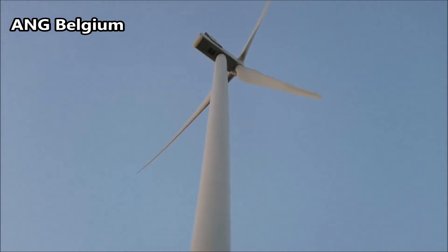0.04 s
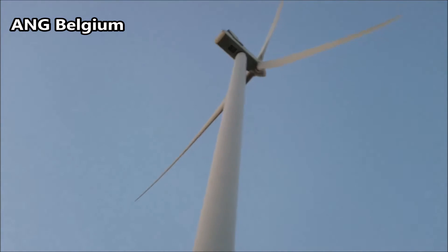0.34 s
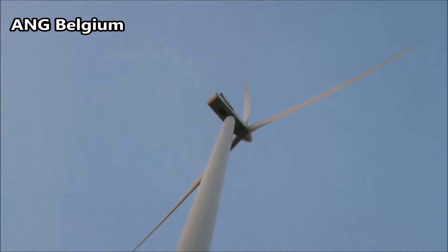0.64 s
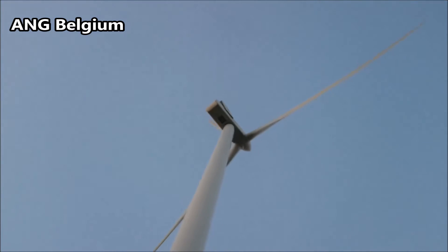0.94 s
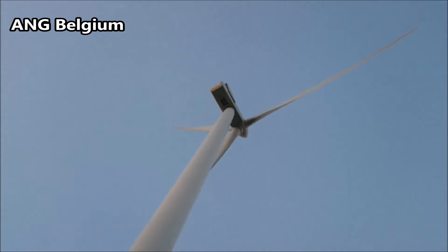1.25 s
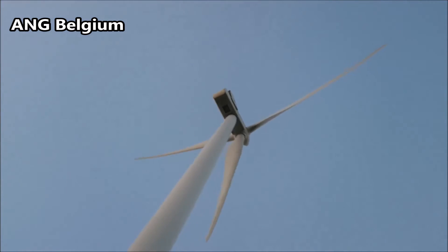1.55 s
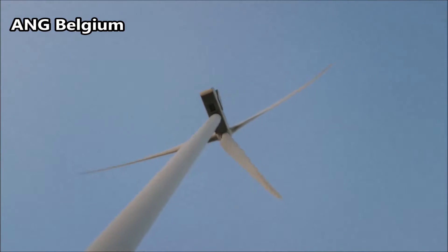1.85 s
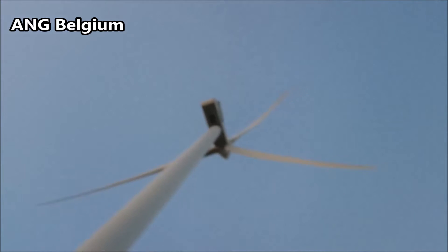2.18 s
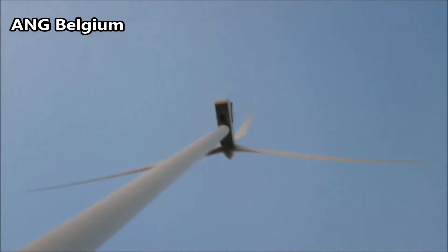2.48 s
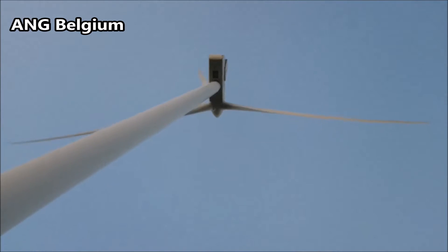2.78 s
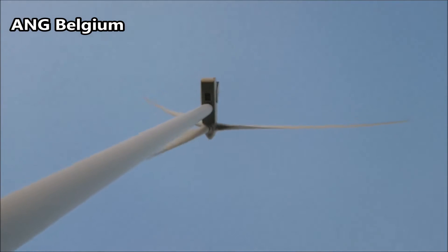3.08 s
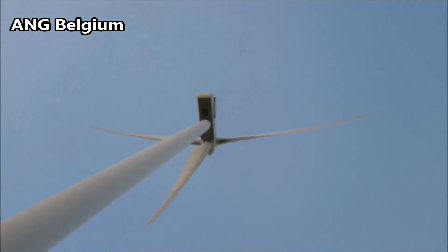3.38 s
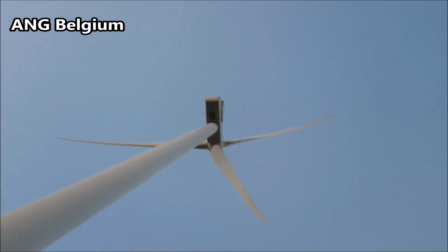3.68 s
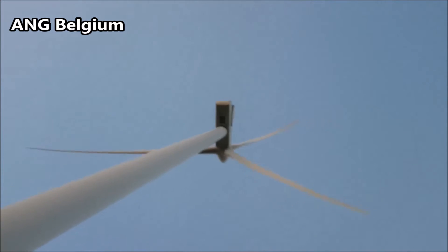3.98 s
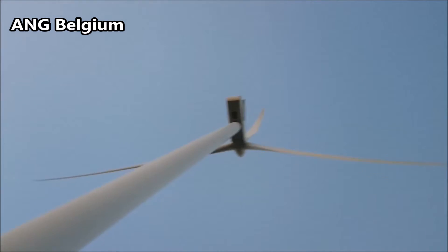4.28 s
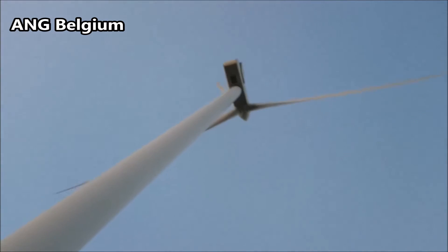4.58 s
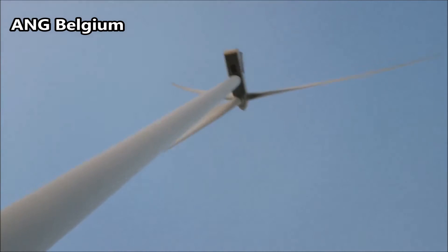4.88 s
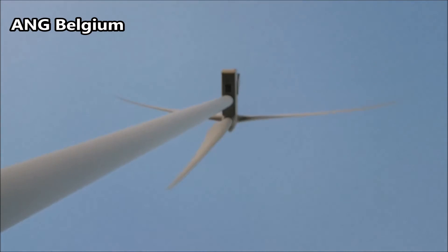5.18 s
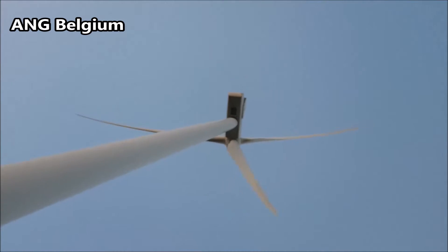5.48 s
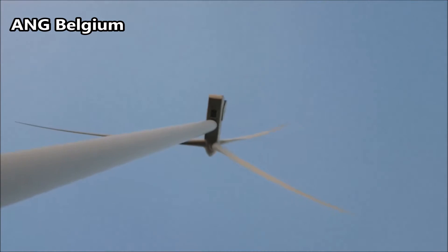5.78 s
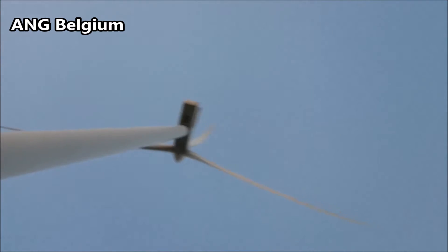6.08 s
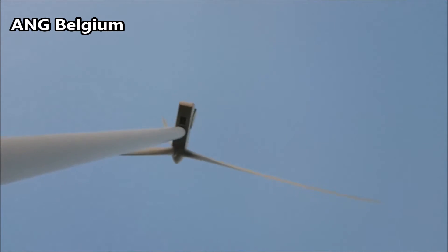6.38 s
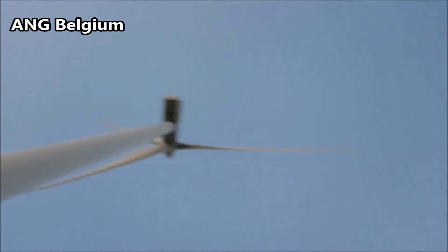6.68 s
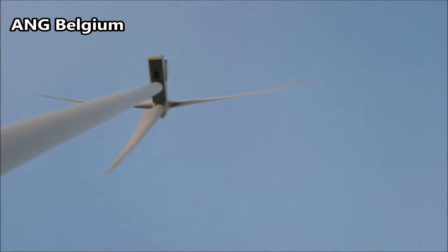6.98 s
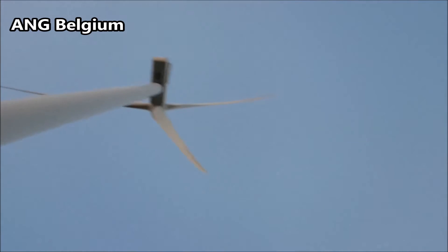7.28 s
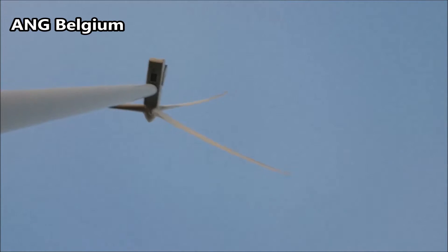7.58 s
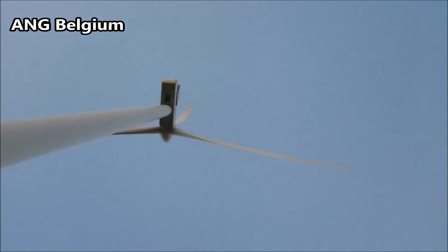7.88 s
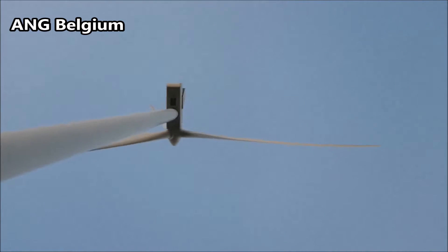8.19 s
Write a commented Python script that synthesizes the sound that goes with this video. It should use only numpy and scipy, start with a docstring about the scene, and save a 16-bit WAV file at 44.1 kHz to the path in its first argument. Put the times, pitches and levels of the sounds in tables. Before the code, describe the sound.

Heavy wind buffeting opens on a hand-held stereo microphone, rumbling and thumping, then settles into lighter, irregular gusts with crackles and hollow puffs. Farther off, the blades of a wind turbine give a soft rush that swells every couple of seconds, while its gears hold a faint, high whine that fades in and out. Now and then a small bird adds thin, faraway chirps in the open air.

```python
"""Gusts under a wind turbine

At the foot of a large turbine, on a hand-held camera's stereo microphone. Gusts hit the two ports
directly, and each rumbles, sputters and hoots in its own eddies. Farther off the blades swish by
and the gearbox whines; a small bird chirps thinly in the distance."""
import sys
import numpy as np
from scipy import signal
from scipy.fft import rfft, irfft, next_fast_len
from scipy.io import wavfile
from scipy.ndimage import uniform_filter1d, minimum_filter1d

SR = 44100
rng = np.random.default_rng(int(sys.argv[2]) if len(sys.argv) > 2 else 0)


def materialize(psi):
    """Save the field psi as 16-bit PCM at rate SR to the path in sys.argv[1].

    A 1-D psi becomes a single channel; in a 2-D psi each row is a channel.
    """
    bounded = np.clip(np.atleast_2d(psi).T, -1, 1)
    quanta = np.round(bounded * 32767).astype(np.int16)
    wavfile.write(sys.argv[1], SR, quanta)


N = 372644
FRAME, HOP = 1024, 256
TIME = np.arange(N) / SR
FRAME_S = np.arange(N // HOP + 5) * HOP / SR
BIN_HZ = np.fft.rfftfreq(FRAME, 1 / SR)


def gain_of(db):
    """Decibels to amplitude."""
    return 10 ** (np.asarray(db) / 20)


def unit_rms(x):
    """Scales to rms 1."""
    return x / np.sqrt(np.mean(x ** 2) + 1e-20)


def at_hz(points, hz):
    """A spectrum's value, interpolated on a log-frequency axis."""
    f, value = np.transpose(points)
    return np.interp(np.log(hz + 1), np.log(f + 1), value)


def at_time(rows, t):
    """The columns of a curve table at times t."""
    times, *columns = np.transpose(rows)
    return [np.interp(t, times, column) for column in columns]


def add(mix, start_s, sound):
    """Mixes a sound in at start_s, or at zero if that is negative."""
    part = mix[max(round(start_s * SR), 0):][:len(sound)]
    part += sound[:len(part)]


def filtered(x, response):
    """Filters by a gain that is a function of frequency."""
    size = next_fast_len(len(x) + 2048, True)
    return irfft(rfft(x, size) * response(np.fft.rfftfreq(size, 1 / SR)), size)[:len(x)]


def lowpass(x, hz, order):
    """Rolls off above hz, by 6 dB an octave for each order."""
    return filtered(x, lambda f: 1 / (1 + (f / hz) ** order))


def wander(rate_hz):
    """A smooth random curve of rms 1, moving at up to about rate_hz."""
    coarse = TIME[::32]
    hz = np.fft.rfftfreq(len(coarse), coarse[1])
    spectrum = rfft(rng.standard_normal(len(coarse))) / (1 + (hz / rate_hz) ** 4)
    return unit_rms(np.interp(TIME, coarse, irfft(spectrum, len(coarse))))


def band_noise(count, hz, width_hz):
    """Noise of rms 1 in one resonance."""
    white = rng.standard_normal(count)
    return unit_rms(filtered(white, lambda f: 1 / (1 + (2 * (f - hz) / width_hz) ** 2)))


def shaped(noise, field_db):
    """Gives unit white noise a level per Hz that changes in time (frames x bins)."""
    framing = dict(nperseg=FRAME, noverlap=FRAME - HOP)
    frames = signal.stft(np.pad(noise, (0, 2 * FRAME)), **framing)[2][:, :len(FRAME_S)]
    return np.sqrt(SR / 2) * signal.istft(frames * gain_of(field_db.T), **framing)[1][:N]


# Steady wind on each port, easing as the camera turns. Small eddies are bright, large ones weighty.
# time_s, strength_db, brightness_db, weight_db
LEFT_FLOW = [(0.0, 2, -2, 4), (.45, -3.5, -2, 10.5), (.8, 1, -7.5, 6.5), (1.25, 2.5, -1.5, 1),
             (1.65, 5.5, -3.5, 5), (2.1, 2.5, -1.5, -3.5), (2.55, 4.5, -6.5, -2.5), (3.0, 4.5, -7.5, -3),
             (3.4, 0.5, -7, 2.5), (3.85, -4.5, 2.5, 1), (4.1, 4, 0, -4), (4.8, 3, -12, 3),
             (5.2, 0.5, 2, -10), (5.6, -8.5, 7, -3), (5.85, -5, 3.5, 0), (6.5, 0.5, 2, 2),
             (7.4, -2.5, 3, -3), (8.44, -1, -2.5, 3)]
RIGHT_FLOW = [(0.0, 14, 7.5, 2), (.3, 12, -2, 3.5), (.65, 9.5, -0.5, 0), (1.0, 7.5, -2.5, -3.5),
              (1.35, 6, -0.5, -3), (1.8, 6.5, -2, 1.5), (2.099, 1.5, -2.5, -3), (2.5, -5.5, -9.5, 6),
              (3.0, -3.5, -7.5, 5), (3.5, -5, -11, 6.5), (3.9, -1.5, -9, 3), (4.2, 0, -8, 3.5),
              (4.6, -0.5, -12, 4.5), (5.1, -0.5, -3.5, -1.5), (5.4, -3.5, -10, 3), (6.0, -4, -5.5, 4),
              (6.55, -2.5, 1, 1), (7.0, -3.5, -6.5, 0.5), (7.5, -6, -13, 6), (8.44, -8, -9, 5)]
# Gusts that bump the mic, and lulls: middle_s, length_s, left_db, right_db, brightness_db, weight_db
GUSTS_AND_LULLS = [(.17, 0.35, 1, -1, 3, 1.5), (0.38, 0.14, -5, 3, -3, -5), (0.635, 0.13, 3.5, 4, 0.5, 1),
                   (1.249, 0.039, 8.5, 3.5, 0, -1), (1.335, 0.085, 2, -7, 2, 2.5),
                   (1.44, 0.087, -1, 0.5, 1, 8), (1.59, 0.11, -1.5, -0.5, -4.5, -1),
                   (1.784, 0.089, 3, 0.5, 1.5, -1), (2.189, 0.14, -5.5, 1.5, -5, 3.5),
                   (2.287, 0.16, 4.5, 9, -3.5, -6.5), (2.526, 0.15, 4, 3, 2, 0.5),
                   (2.749, 0.25, 7.5, 8.5, 1, -1.5), (3.01, 0.079, 0.5, -7.5, 2, 9),
                   (3.127, 0.1, -3, 0.5, -2, 6.5), (3.248, 0.12, -1.5, -10.5, 9, 7.5),
                   (3.48, 0.033, 4.5, -5, 3.5, -2), (3.632, 0.17, 11.5, 2.5, -7, -4.5),
                   (3.77, 0.066, -3, -5.5, 2, -1.5), (4.163, 0.18, 2, 6, 2, -4), (4.27, .06, 1, 1, 0.5, -5),
                   (4.51, 0.15, 4, 2, 0, 1), (4.662, 0.16, 2.5, -5.5, 0.5, -1.5),
                   (4.89, 0.58, 5, 5, 3.5, -5.5), (5.187, 0.08, 5, 0, 3, 3), (5.797, 0.23, 6, 4.5, 3, 1.5),
                   (5.99, 0.16, 1, -8, 2.5, 2), (6.194, 0.078, -5, -2.5, 0, 4),
                   (6.395, 0.084, 5.5, 0.5, -4, -2), (6.753, 0.23, -4, -3, -0.5, 2.5),
                   (6.859, 0.16, 3, 5.5, -3.5, 1.5), (7.063, 0.095, -9, 1, 1, -4),
                   (7.126, 0.29, 3, 7, -5.5, -6), (7.696, 0.1, 5, 5, -5, 1.5), (7.89, 0.08, -3, -7, -4, 6),
                   (8.024, 0.23, 1.5, 3.5, 0, 1)]
def wind_at(port, t):
    """Strength, brightness and weight in dB on port 0 (left) or 1 (right): steady flow plus gusts."""
    strength, bright, weight = at_time((LEFT_FLOW, RIGHT_FLOW)[port], t)
    for middle_s, length_s, left_db, right_db, bright_db, weight_db in GUSTS_AND_LULLS:
        swell = np.cos(np.pi * np.clip((t - middle_s) / length_s, -.5, .5))
        strength += swell * (left_db, right_db)[port]
        bright += swell * bright_db
        weight += swell * weight_db
    return strength, bright, weight


def eddies():
    """White noise whose low bands each carry a steady flow of energy."""
    white, steadying = rng.standard_normal(N), np.zeros(N)
    for low_hz, high_hz in [(0, 110), (110, 330), (330, 1000)]:
        band = filtered(white, lambda f: (f >= low_hz) & (f < high_hz))
        power = uniform_filter1d(uniform_filter1d(band ** 2, size=2400), size=2400)
        steadying += band * (np.sqrt(power.mean() / power) - 1)
    return white + steadying


# Turbulence right on each port in average wind: frequency_hz, level_db_per_hz
LEFT_TURBULENCE = [(10, -45.5), (43, -56.5), (90, -56.5), (160, -55.5), (280, -57.5), (450, -61),
                   (700, -69), (1000, -76.5), (1450, -85), (2000, -93), (3000, -107), (6000, -125),
                   (16000, -145)]
RIGHT_TURBULENCE = [(10, -34.5), (43, -42.5), (90, -41), (170, -46.5), (280, -53), (450, -61), (700, -70.5),
                    (1000, -79), (1450, -83.5), (2000, -99), (3000, -104), (6000, -113), (10000, -123),
                    (16000, -135)]
def buffet(port, unsteady_db, puffy_db, sputter_db, sputter_hz, split_hz, puff_slope, top_slope):
    """Wind on one port: large eddies rumble, small ones come in puffs and quick sputters."""
    strength, bright, weight = wind_at(port, FRAME_S)
    strength += unsteady_db * np.interp(FRAME_S, TIME, wander(6.3))
    bright += puffy_db * np.interp(FRAME_S, TIME, wander(6.7))
    small = at_hz([(230, 0.047), (450, 0.56), (720, puff_slope), (1300, top_slope)], BIN_HZ)
    large = at_hz([(80, 0.9), (150, 0)], BIN_HZ)
    average_db = at_hz((LEFT_TURBULENCE, RIGHT_TURBULENCE)[port], BIN_HZ)
    field_db = average_db + strength[:, None] + np.outer(bright, small) + np.outer(weight, large)
    flow = shaped(eddies(), field_db)
    flow *= unit_rms(gain_of(2.33 * wander(25)))  # the whole stream lurches
    rumble = lowpass(flow, split_hz, order=4)
    sputter = unit_rms(gain_of(sputter_db * 2 * np.tanh(wander(sputter_hz) / 2)))
    return rumble + (flow - rumble) * sputter


def swish(t, blade_s=1.755, start_s=1.735, rise_s=.16, hold_s=.23, fade_s=.82):
    """A blade comes down every blade_s: rise, hold, fade and lull, between about -1/2 and 1/2."""
    corners_s = np.cumsum([0, rise_s, hold_s, fade_s])
    return np.interp((t - start_s) % blade_s, corners_s, [-.54, .64, .45, -.5])[:, None]


# Rush of the blades, heard from the ground: frequency_hz, level_db_per_hz
RUSH_SPECTRUM = [(100, -66.5), (500, -78), (1000, -85.5), (1400, -88), (2000, -95), (2500, -92.5),
                 (3200, -90.5), (4200, -95), (5200, -101), (7000, -108), (11000, -115), (13000, -120),
                 (14200, -117), (15500, -121)]
# Its mean treble level as the camera turns: time_s, left_db, right_db
RUSH_LEVELS = [(0.0, -0.5, -2.5), (1.199, -1.5, -2), (2.1, 0, -2), (3.4, -3, -2), (3.8, -1, -1.5),
               (4.6, -1.5, -0.5), (5.6, -0.5, 1.5), (6.4, 0.5, 0.5), (6.7, 1, 4), (6.92, -2.5, -0.3),
               (7.15, -2.5, 3), (7.5, 1, 3), (8.44, 0.5, 2)]
def blades(swings_db, patchy_db, flutter_db, hiss_lag_s):
    """Trailing edges rush overhead, swelling as each blade comes down and fading as it climbs."""
    hiss = at_hz([(4200, 0), (5800, 0.75)], BIN_HZ)
    depth = at_hz([(900, 0.16), (2800, 1)], BIN_HZ)  # the lows barely swing
    cycle = (1 - hiss) * swish(FRAME_S) + hiss * swish(FRAME_S - hiss_lag_s)
    ports = []
    for mean_db, swing_db in zip(at_time(RUSH_LEVELS, FRAME_S), swings_db):
        patches = rng.standard_normal((len(FRAME_S), len(BIN_HZ)))
        patches = uniform_filter1d(patches, size=14, axis=0)
        patches = unit_rms(uniform_filter1d(patches, size=10, axis=1))
        swell_db = (mean_db[:, None] + swing_db * cycle) * depth
        field_db = at_hz(RUSH_SPECTRUM, BIN_HZ) + swell_db + patchy_db * patches
        ports.append(shaped(rng.standard_normal(N), field_db) * gain_of(flutter_db * wander(44)))
    return np.array(ports)


# Resonances inside the mic's right port: frequency_hz, gain_db
CAVITY_RESPONSE = [(600, -2), (1000, 1.5), (1400, 11), (2000, 7), (2500, -6), (3200, -3.5), (4200, -0.5),
                   (5200, 5.5), (5800, 18.5), (6300, 18.5), (7000, 4.5), (8500, -2.5), (13000, 0),
                   (15000, 1)]
def port_cavity(sound):
    """The right port's cavity colours distant sound on its way in."""
    return filtered(sound, lambda f: gain_of(at_hz(CAVITY_RESPONSE, f)))


# The gears up the tower speed up slightly: time_s, pitch_hz
MESH_PITCH = [(0.0, 1650), (2.6, 1651), (3.6, 1661), (4.3, 1655), (5.0, 1666), (5.8, 1661), (6.5, 1663),
              (7.0, 1667), (7.7, 1663), (8.44, 1664)]
# Their whine comes and goes on the wind: time_s, mesh_left_db, mesh_right_db, sideband_right_db
WHINE_LEVELS = [(0, -69.5, -55.0, -62.5), (0.45, -57.0, -50.5, -56.0), (0.78, -60.5, -51.0, -59.5),
                (1.05, -59.0, -64.0, -62.0), (1.5, -65.0, -68.0, -64.5), (1.8, -65.5, -61.0, -51.5),
                (2.15, -63.0, -55.5, -61.5), (2.33, -64.5, -56.5, -59.0), (2.55, -54.0, -47.5, -57.5),
                (2.8, -60.0, -56.0, -73.5), (3.1, -65.5, -62.0, -61.5), (3.4, -60.5, -51.5, -57.5),
                (3.62, -57.0, -49.5, -51.0), (3.82, -69.0, -64.5, -59.5), (4.0, -53.0, -58.5, -57.5),
                (4.2, -59.5, -58.0, -55.5), (4.52, -57.5, -46.0, -64.5), (4.78, -71.5, -58.0, -64.5),
                (5.02, -57.0, -45.5, -49.0), (5.17, -57.5, -54.5, -61.0), (5.3, -53.0, -52.0, -55.0),
                (5.55, -61.5, -59.0, -68.0), (5.85, -51.0, -49.5, -53.5), (6.1, -55.0, -54.0, -56.0),
                (6.3, -54.0, -46.0, -55.5), (6.52, -52.0, -44.0, -49.5), (6.78, -55.5, -57.5, -60.0),
                (7.1, -56.0, -50.0, -55.5), (7.33, -56.5, -57.0, -61.5), (7.52, -55.0, -45.5, -49.5),
                (7.72, -54.5, -43.5, -52.5), (7.95, -57.0, -49.0, -57.0), (8.15, -60.0, -46.5, -57.5),
                (8.35, -58.5, -46.0, -60.5), (8.44, -60.5, -48.5, -57.0)]
def gearbox(level_db, spacing_hz, left_sideband_db, outer_db, waver_hz, flicker_db, fuzz_db, fuzz_hz):
    """A mesh tone and two upper sidebands follow the rotor's speed, roughened by the moving air."""
    out = np.zeros((2, N))
    mesh_hz, = at_time(MESH_PITCH, TIME)
    left_db, right_db, right_sideband_db = at_time(WHINE_LEVELS, TIME)
    inner_db = np.array([left_db + left_sideband_db, right_sideband_db])
    right_lag_turns = .38 + .05 * wander(1.3)
    for order, levels in enumerate([(left_db, right_db), inner_db, inner_db + outer_db]):
        turns = np.cumsum(mesh_hz + order * spacing_hz + waver_hz * wander(13)) / SR
        for port, db in enumerate(levels):
            scatter = 1 + gain_of(fuzz_db) * (wander(fuzz_hz) + 1j * wander(fuzz_hz))
            tone = np.sqrt(2) * (scatter * np.exp(2j * np.pi * (turns - port * right_lag_turns))).real
            out[port] += tone * gain_of(level_db + db + flicker_db * wander(8.1))
    return out


# Breathy notes right at the mic:
# middle_s, half_length_s, pitch_hz, width_hz, level_db, bend_octaves (each way), port
PORT_NOTES = [(.134, 0.16, 298, 103, -28, 0, 0), (.989, 0.031, 417, 160, -39, -0.017, 1),
              (1.147, 0.16, 1500, 220, -49, .08, 1), (2.612, 0.17, 1520, 400, -48.5, 0.015, 1),
              (2.78, .13, 520, 450, -34, 0.025, 0), (2.85, 0.086, 1540, 260, -50, 0, 1),
              (3.025, 0.076, 507, 450, -34, 0, 0), (3.173, 0.087, 396, 130, -35.5, 0, 0),
              (3.258, .059, 510, 220, -30, 0.16, 0), (3.572, 0.028, 460, 457, -29, 0.011, 0),
              (3.632, 0.062, 550, 453, -31, 0, 0), (3.863, .12, 1390, 260, -52.5, -0.019, 1),
              (4.35, 0.22, 1430, 260, -52, 0, 1), (4.48, 0.096, 1460, 260, -47, .08, 1),
              (4.467, 0.042, 525, 560, -29, 0, 0), (4.856, 0.037, 686, 450, -32.5, -0.041, 0),
              (4.989, .16, 1490, 550, -49.5, 0, 1), (5.088, 0.033, 560, 350, -31, -0.01, 0),
              (5.179, 0.043, 597, 380, -31, .2, 0), (5.56, .15, 1500, 440, -49, 0, 1),
              (5.769, .26, 1377, 300, -47, -.08, 1), (6.018, .024, 422, 170, -24.5, -.25, 0),
              (6.281, 0.035, 457, 170, -29.5, -0.13, 0), (6.367, 0.027, 388, 200, -30, -0.29, 0),
              (6.426, 0.027, 550, 100, -38, -0.02, 0), (6.599, 0.034, 510, 280, -26, -0.0046, 0),
              (7.125, .04, 505, 130, -30.5, 0.12, 0), (7.38, 0.16, 1402, 260, -50.5, -0.02, 1),
              (7.594, .039, 299, 90, -26, -0.017, 0)]
def hoots(port_db, steadiness):
    """Resonances swell, bend and fade as air crosses a port: narrow ones hoot, wide ones puff."""
    out = np.zeros((2, N))
    for middle_s, half_s, hz, width_hz, db, bend_octaves, port in PORT_NOTES:
        count = int(2 * half_s * SR)
        air = signal.hilbert(lowpass(band_noise(count, hz, width_hz), hz + width_hz, order=12))
        power = abs(uniform_filter1d(abs(air) ** 2, size=300))
        air /= power ** (steadiness / 2)
        shift_hz = hz * (2 ** (bend_octaves * np.linspace(-1, 1, count)) - 1)
        note = unit_rms((air * np.exp(2j * np.pi * np.cumsum(shift_hz) / SR)).real)
        add(out[port], middle_s - half_s, gain_of(db + port_db[port]) * note * np.hanning(count))
    return out


def stray_eddies(level_db, spread_db, growth, low_hz, high_hz, per_port):
    """Chance eddies, louder in strong, bright wind: rows of time_s, level_db, pitch_hz, port."""
    rows = []
    for port in (0, 1):
        when, weakness, pitch = rng.random((per_port, 3)).T
        time_s = when * N / SR
        strength, bright, _ = wind_at(port, time_s)
        db = level_db + growth * (strength + bright) - spread_db * weakness
        hz = low_hz * (high_hz / low_hz) ** pitch
        rows += [(*row, port) for row in zip(time_s, db, hz)]
    return rows


# The sharpest eddies slap the mic, large ones with a thud: crest_s, level_db, pitch_hz, port
SHARP_EDDIES = [(0.046, -17, 520, 1), (0.096, -12.5, 700, 1), (0.138, -16.5, 700, 1), (0.204, -6, 413, 1),
                (0.263, -16, 500, 1), (0.583, -13, 560, 1), (0.599, -19, 1010, 1), (0.672, -18, 800, 1),
                (0.766, -9, 390, 1), (0.792, -11, 380, 1), (0.817, -10.5, 420, 1), (0.994, -14, 420, 1),
                (1.279, -19, 720, 1), (1.316, -19.5, 560, 0), (1.443, -21, 1350, 1), (1.568, -14, 426, 1),
                (1.615, -11, 293, 1), (1.761, -8, 304, 1), (1.992, -18.5, 1250, 1), (1.999, -18, 1340, 1),
                (2.027, -19.5, 1440, 1), (2.259, -15, 300, 0), (2.298, -18, 700, 0), (2.3, -12, 260, 1),
                (2.692, -12, 420, 0), (2.984, -26, 600, 0), (3.087, -20, 313, 1), (3.191, -17.5, 1100, 1),
                (3.194, -18.5, 560, 0), (3.277, -25, 800, 0), (3.56, -13, 302, 0), (4.837, -16.5, 800, 0),
                (4.877, -25.5, 1540, 0), (5.093, -26, 700, 0), (5.221, -22, 1400, 1), (5.235, -25, 1410, 1),
                (5.258, -16.5, 420, 0), (6.097, -26.5, 1622, 1), (6.128, -27, 1060, 0),
                (6.677, -22.5, 1390, 1), (6.968, -20, 480, 0), (6.995, -11, 230, 1), (7.175, -23, 480, 0),
                (7.832, -23.5, 1621, 1), (7.875, -19.5, 1300, 1), (8.227, -17, 1420, 1)]
def slaps(strays, level_db, rise_cycles, ring_cycles, wake_db, wake_s, snap_db, snap_top_hz):
    """A rounded pressure pulse snaps at its crest, rings a cycle or two and leaves a rustling wake."""
    out, t = np.zeros((2, N)), np.arange(-400, 2400) / SR
    wake_age = np.maximum(t, 0) / wake_s
    taper = signal.windows.tukey(len(t), .1)
    for crest_s, db, hz, port in SHARP_EDDIES + strays:
        turns = hz * t
        pulse = np.cos(2 * np.pi * turns) / (np.exp(-turns / rise_cycles) + np.exp(turns / ring_cycles))
        snap_phase = np.pi * min(2 * hz, snap_top_hz) * t
        snap = (1 - 2 * snap_phase ** 2) * np.exp(-snap_phase ** 2)
        rustle = lowpass(band_noise(len(t), hz, hz), 1.6 * hz, order=6)
        wake = rustle * wake_age * np.exp(1 - wake_age)
        slap = pulse / pulse.max() + gain_of(snap_db) * snap + gain_of(wake_db) * wake
        add(out[port], crest_s + t[0], gain_of(db + level_db) * slap * taper)
    return out


# The loudest wind ticks on the mic: start_s, level_db, pitch_hz, width_hz, decay_s, port
LOUD_TICKS = [(0.096, -38, 2200, 2200, 0.0008, 1), (0.124, -33, 2200, 3000, 0.00094, 1),
              (0.139, -32.5, 1900, 2600, 0.0014, 1), (0.204, -40, 2300, 3500, 0.00072, 1),
              (.238, -28, 4000, 16000, 0.00026, 1), (0.385, -35, 1700, 1600, 0.0012, 1),
              (.582, -35, 2000, 1900, 0.0013, 1), (.598, -33, 1800, 1400, 0.001, 1),
              (.613, -32.5, 1700, 1800, 0.0011, 1), (0.516, -39, 1900, 1400, 0.001, 1),
              (0.671, -33.5, 1790, 1600, 0.00094, 1), (2.079, -40.5, 3220, 2400, 0.0057, 0),
              (3.082, -57, 7300, 1100, 0.003, 1), (3.106, -55, 7300, 1100, 0.002, 1),
              (3.157, -56, 6800, 1500, 0.004, 1), (3.19, -51, 6800, 2200, 0.003, 1),
              (3.188, -33, 1200, 1700, 0.0043, 1), (4.835, -37, 2400, 2200, 0.0008, 0),
              (4.849, -45, 2000, 1600, 0.0072, 0), (4.876, -39, 2400, 2200, 0.0015, 0),
              (5.449, -38, 5840, 1400, 0.0045, 1), (5.467, -43, 6200, 2400, 0.0086, 1),
              (7.377, -39, 2780, 2200, 0.0054, 0)]
def ticks(strays, level_db, crackle_width_hz, crackle_decay_s):
    """Tiny noise bursts at a port, each in one broad resonance; stray eddies crackle in between."""
    out, t = np.zeros((2, N)), np.arange(3000) / SR
    crackle = [(s, db, hz, crackle_width_hz, crackle_decay_s, port) for s, db, hz, port in strays]
    for start_s, db, hz, width_hz, decay_s, port in LOUD_TICKS + crackle:
        burst = rng.standard_normal(len(t)) * (t / decay_s) * np.exp(-t / decay_s)
        tick = filtered(burst, lambda f: 1 / (1 + (2 * (f - hz) / width_hz) ** 2) ** 1.7)
        add(out[port], start_s, gain_of(db + level_db) * tick / abs(tick).max())
    return out


# A small bird, far off: start_s, length_s, start_hz, end_hz, level_db, buzz_depth
BIRD_NOTES = [(0.895, 0.1, 6270, 6240, -70.5, .2), (0.91, .06, 6370, 6390, -72, .4),
              (0.892, .08, 5740, 5710, -72, .1), (1.209, 0.11, 6250, 6210, -77.5, .1),
              (1.375, 0.16, 6230, 5970, -69.5, .1), (1.374, 0.14, 5930, 5790, -66, 0),
              (3.11, 0.12, 5670, 5540, -75, 0.6), (3.222, 0.1, 5570, 5380, -75.5, .4),
              (3.3, 0.1, 5420, 5380, -79, .1), (4.71, 0.12, 7620, 7560, -73, .8),
              (4.818, 0.12, 7370, 7190, -70, .4), (4.931, 0.13, 7470, 7500, -65, 0.7),
              (5.022, .07, 7500, 7400, -71, 0.8), (6.322, 0.069, 6200, 6200, -86, .1),
              (6.452, 0.36, 6430, 6280, -67.5, .05), (6.494, 0.11, 6120, 6000, -76, 0.2),
              (6.5, 0.19, 5860, 5880, -62.5, 0.2)]
def bird(left_db, right_db, buzz_hz, jitter_hz, flutter_db, breath):
    """Thin gliding notes with a breathy edge, some with a fast buzz; they flutter in the wind."""
    song, jitter = np.zeros(N), jitter_hz * wander(150)
    for start_s, length_s, start_hz, end_hz, db, buzz_depth in BIRD_NOTES:
        t = np.arange(int(length_s * SR)) / SR
        glide_hz = start_hz + (end_hz - start_hz) * (t / length_s) ** 2
        hz = glide_hz + jitter[int(start_s * SR):][:len(t)]
        buzz = 1 + buzz_depth * np.sin(2 * np.pi * buzz_hz * t)
        note = np.sin(2 * np.pi * np.cumsum(hz) / SR) * buzz
        swell = np.sin(np.pi * t / length_s)
        hiss = breath * swell ** 2 * band_noise(len(t), start_hz, width_hz=1500)
        add(song, start_s, gain_of(db) * swell * (note + hiss))
    return song * gain_of(flutter_db * wander(60)) * gain_of([[left_db], [right_db]])


def scene():
    """Wind right on the microphone, with the blades, gearbox and bird behind it."""
    rush = blades(swings_db=(3.5, 1.5), patchy_db=1.92, flutter_db=1.78, hiss_lag_s=.04)
    song = bird(left_db=-5.5, right_db=.5, buzz_hz=265, jitter_hz=11, flutter_db=2, breath=.49)
    far_left, far_right = rush + song
    far = np.array([far_left, port_cavity(far_right)])
    wind = np.array([
        buffet(port=0, unsteady_db=1, puffy_db=1.1, sputter_db=4, sputter_hz=60.3,
               split_hz=590, puff_slope=.96, top_slope=.98),
        buffet(port=1, unsteady_db=.5, puffy_db=1.1, sputter_db=3, sputter_hz=73,
               split_hz=630, puff_slope=.56, top_slope=.92)])
    wind += hoots(port_db=(1, 5), steadiness=.7)
    small = stray_eddies(level_db=-34, spread_db=10.5, growth=.5, low_hz=500, high_hz=1400, per_port=16)
    wind += slaps(small, level_db=-3, rise_cycles=.3, ring_cycles=.8,
                  wake_db=-17, wake_s=.005, snap_db=-9, snap_top_hz=930)
    tiny = stray_eddies(level_db=-43.5, spread_db=14, growth=.8, low_hz=1100, high_hz=1800, per_port=160)
    wind += ticks(tiny, level_db=3.5, crackle_width_hz=1500, crackle_decay_s=.0015)
    whine = gearbox(level_db=.5, spacing_hz=100, left_sideband_db=-7, outer_db=-11,
                    waver_hz=1.2, flicker_db=1, fuzz_db=-17, fuzz_hz=28)
    return far + wind + whine


def record(dry):
    """The camera's soft limiter rides down the strongest gusts; its band limit trims the top."""
    ceiling, knee, edge_hz = .88, 8, 15700
    soft_gain = (1 + (abs(dry) / ceiling) ** knee) ** (-1 / knee)
    held_gain = minimum_filter1d(soft_gain, size=241)
    limited = dry * uniform_filter1d(uniform_filter1d(held_gain, size=121), size=121)
    limited *= signal.windows.tukey(N, .001)
    band_limit = signal.firwin(511, edge_hz, window=("kaiser", 9), fs=SR)
    return signal.oaconvolve(limited, band_limit[None], "same")


dry = scene()
out = record(dry)
materialize(out)
```